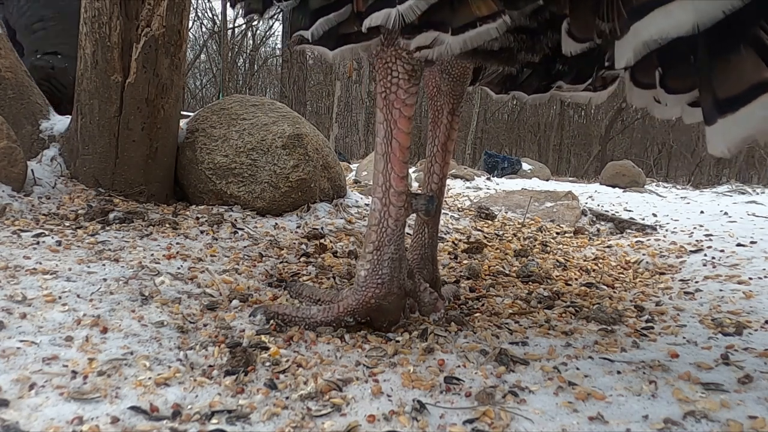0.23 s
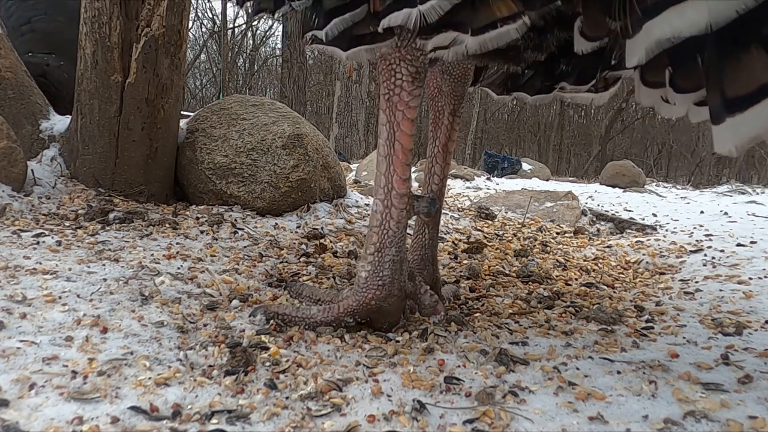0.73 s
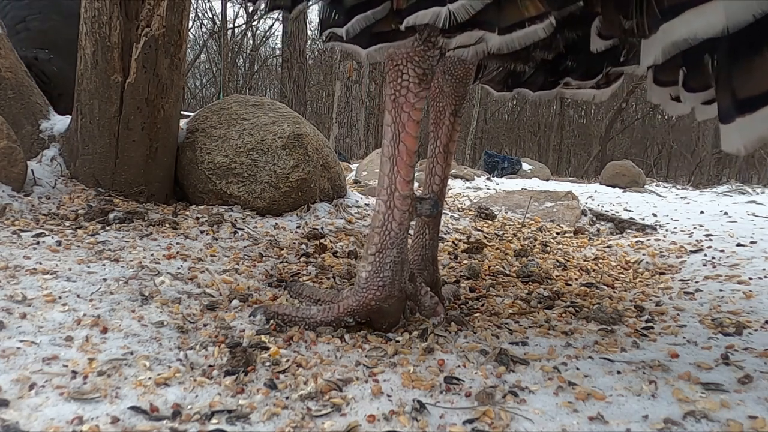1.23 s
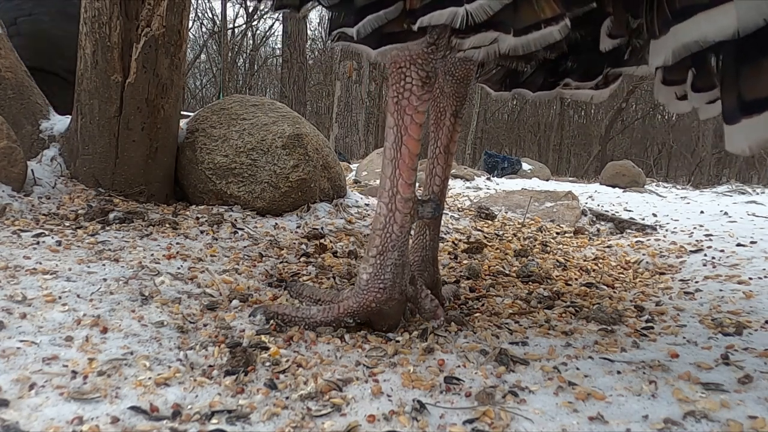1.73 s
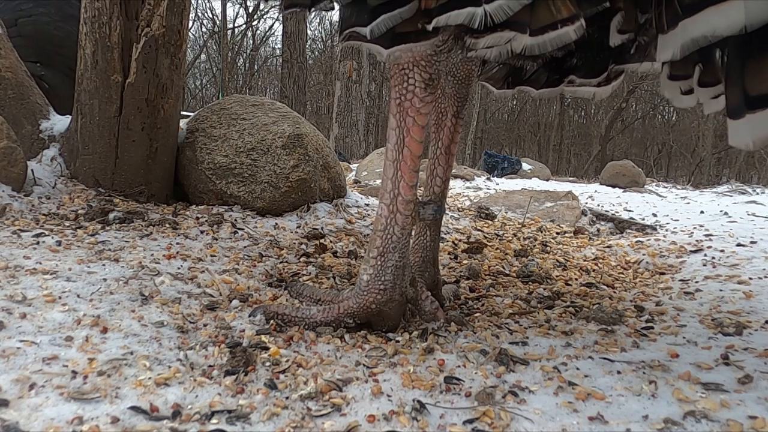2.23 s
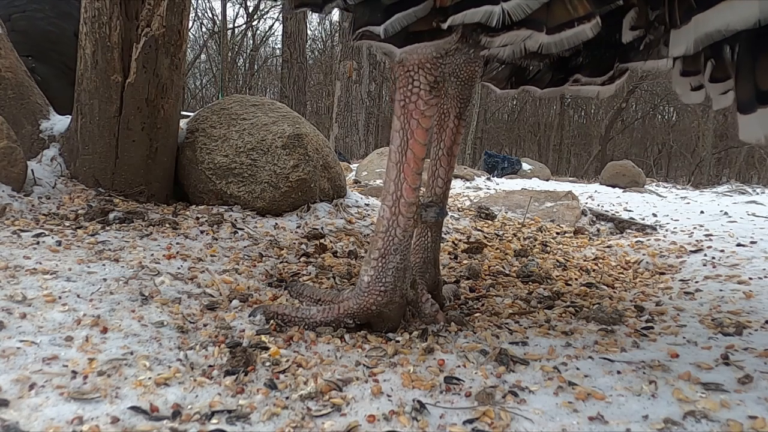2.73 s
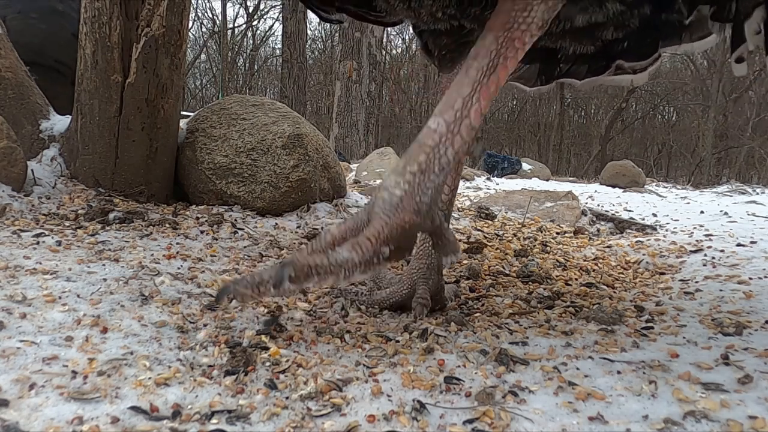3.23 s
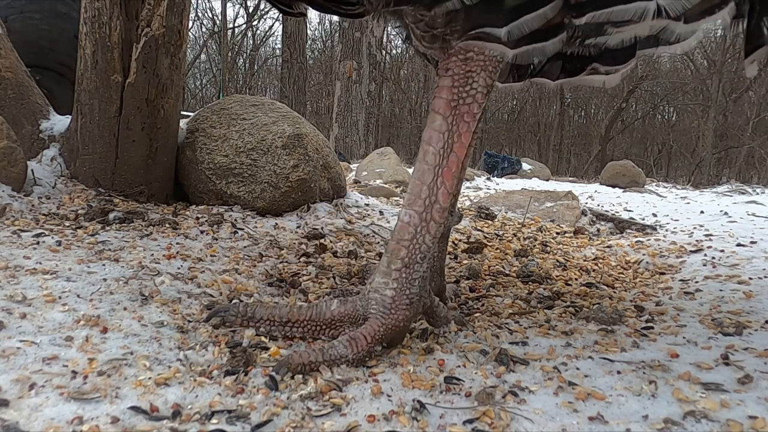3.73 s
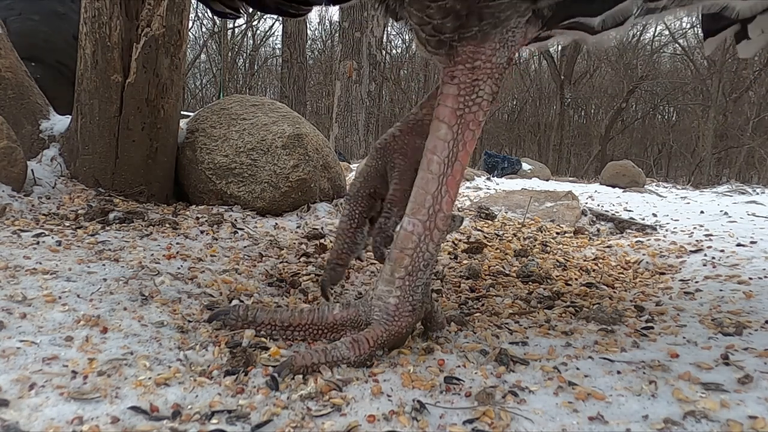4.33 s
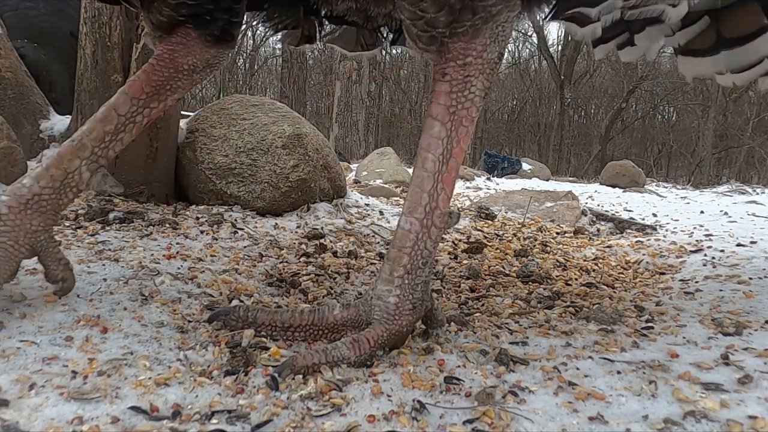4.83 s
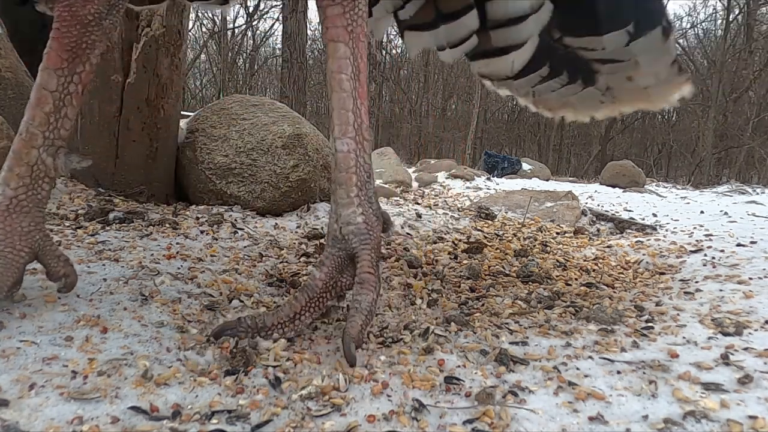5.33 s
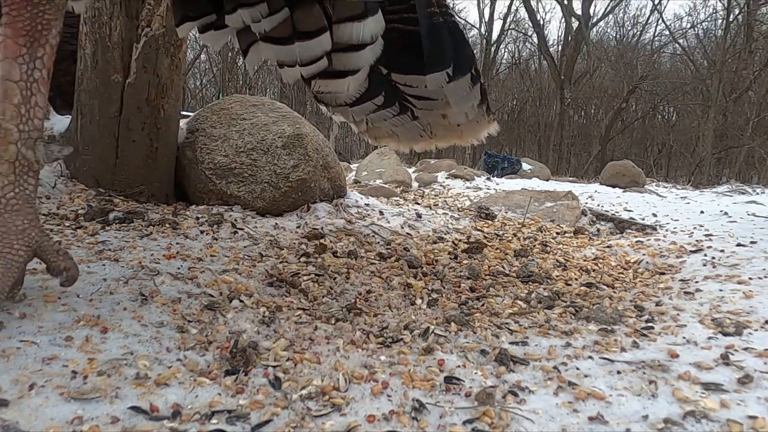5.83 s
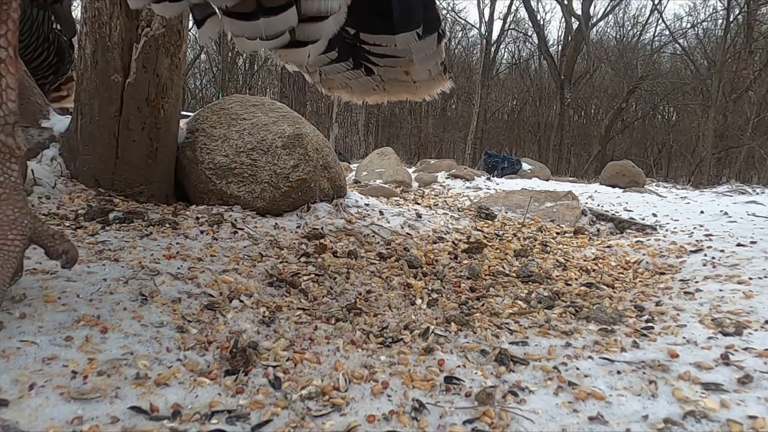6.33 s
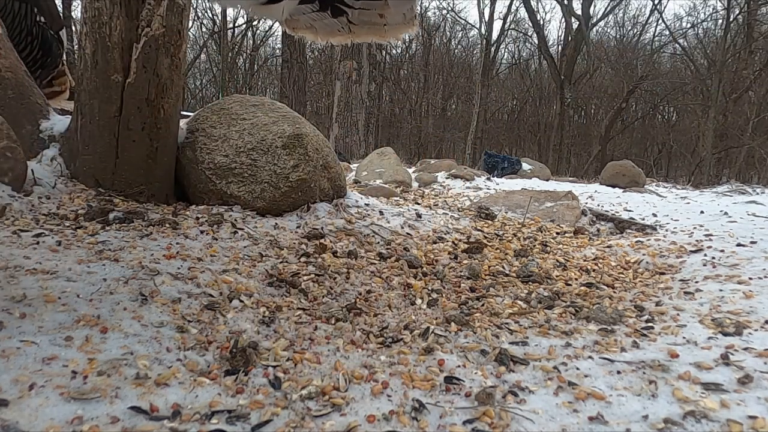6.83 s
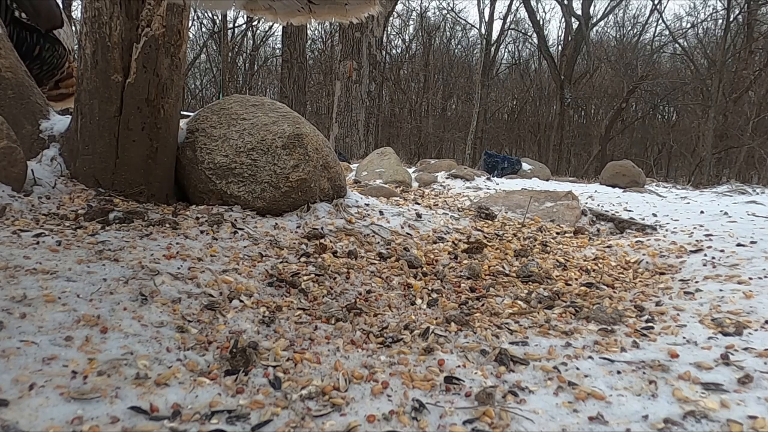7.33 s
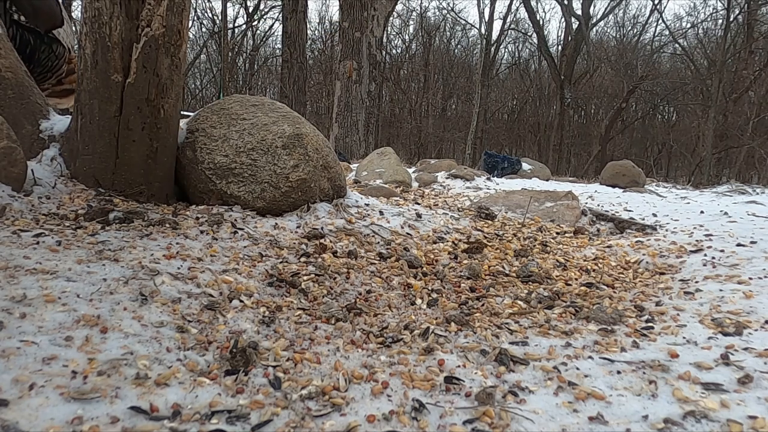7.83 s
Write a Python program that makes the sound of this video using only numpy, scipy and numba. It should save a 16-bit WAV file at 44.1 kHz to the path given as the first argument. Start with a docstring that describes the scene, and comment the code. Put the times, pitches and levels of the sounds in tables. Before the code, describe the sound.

Outdoors, over a soft low rumble and faint chirps of small birds, a turkey very close to the microphone whines thinly, pauses and whines again. Light scuffs and tiny snaps follow as it steps over frozen snow and seeds. A single loud gobble bursts out, a fast, rough warble about a second long with dull thumps beneath. Afterwards only a few faint ticks, chirps and the quiet woodland air remain.

```python
"""A soft, wavering whine sounds over a low, distant rumble: a wild turkey stands close by on snowy ground.
It whines again, shuffles over crust and seeds, then gobbles: three pitched cries and a run of rough
rattles, each closing in a low hoot. Squeaks lead into some of them, and its chest thumps.
The voice is a source and a filter: membranes in the syrinx vibrate, throat and beak shape the harmonics.
Small birds chirp among the trees at the edge of the wood."""
import sys
import numpy as np
from scipy import signal
from scipy.fft import rfft, irfft
from scipy.io import wavfile
from scipy.ndimage import uniform_filter1d
from numba import njit

SR = 44100
rng = np.random.default_rng(int(sys.argv[2]) if len(sys.argv) > 2 else 0)


def transcribe(u):
    """Save the signal u as a 16-bit wav file named by the first command-line argument.

    u: samples, shape (n,) or (channels, n), limited to [-1, 1]; the rate is SR.
    q: integer samples, one column per channel.
    """
    v = np.clip(np.atleast_2d(u).T, -1, 1)
    q = np.round(v * 32767).astype(np.int16)
    wavfile.write(sys.argv[1], SR, q)


N = 356548
T = np.arange(N) / SR
GOBBLE_START_S, GOBBLE_END_S = 5.28, 6.2
GOBBLING = (T > GOBBLE_START_S) & (T < GOBBLE_END_S)

# rattles that each close in a hoot (start [s], length [s], first pitch [Hz], last pitch [Hz],
# roughness [0-1], fundamental [dB], overtones [dB], hoot [dB])
SYLLABLES = [(5.386, 0.053, 795.3, 782, 0.53, -12, -24, -11),
             (5.491, .015, 711.6, 745, 0.75, -20, -18.5, -8.5),
             (5.555, .083, 718, 1066, 0.4, -13, -21, -13),
             (5.690, .014, 927.7, 909.5, 0.7, -15, -22.5, -12.5),
             (5.746, 0.011, 953, 929, 0.6, -11.5, -21, -19),
             (5.881, .016, 941.4, 879, 0.74, -16, -22, -22.5),
             (5.99, .014, 923, 949.5, 0.15, -17.5, -27.5, -15.5),
             (6.064, 0.032, 850.3, 746, 0.73, -16, -31, -12.5),
             (6.151, 0.0094, 943, 959, 0.62, -21.5, -31, -45)]
# frequency response of windpipe and throat (frequency [Hz], gain [dB])
THROAT = [(300, -10), (540, 7), (960, 4), (1400, -3.5), (3100, -5.5), (3550, -22), (4200, -1.5), (6100, -6),
          (7600, -1.5), (9300, -9), (15000, -20)]


def gobble(rough_rasp_db=8, upper_db=13.5, upper_width_hz=480.):
    """Source and filter: the vocal tract shapes the syrinx's tone, and three bands swell separately."""
    # the moving beak and loose throat
    # (time [s], resonance [Hz], upper resonance [Hz], rasp re overtones [dB], flapping hum [dB])
    mouth = [(5.318, 1780, 4350, -18, -0.5), (5.372, 1870, 4400, -27.5, -8), (5.392, 1530, 4400, -7, -9.5),
             (5.425, 2420, 4550, -3.5, 6.5), (5.5, 3080, 4300, -13, -9.5), (5.58, 2330, 4650, -6, -11.5),
             (5.63, 2670, 4350, -6, -2), (5.75, 2980, 4600, -9.5, -11), (6.08, 2740, 4950, -8, -13.5)]
    beak_hz, upper_hz, rasp_db, hum_db = curves(mouth, T)
    hz, rough, fundamental_gain, overtone_gain = strongest_gesture()
    # loose tissue flaps well below the pitch, and hums
    flap = np.sin(turns(200 * (1 + .12 * noise(10, 100))))
    voice = colour(syrinx(hz, rough, flap, beak_hz), THROAT)
    voice = stretched_throat(scatter(bounce(voice), wet_db=-11, t60_s=.04))
    bands_hz = [(250, 1280), (1350, 3500), (3700, 16000)]
    core, overtones, rasp = (even(band(voice, lo, hi, order=4)) for lo, hi in bands_hz)
    rasp = even(rasp + undb(upper_db) * resonance(rasp, upper_hz, upper_width_hz))
    lower = core + undb(hum_db) * rough * flap
    # the rougher the vibration, the harder the membranes slap
    upper = overtones + undb(rasp_db + rough_rasp_db * (rough - .5)) * rasp
    return GOBBLING * (fundamental_gain * lower + overtone_gain * upper)


def syrinx(hz, rough, flap, beak_hz, jitter=.1, flutter=.11, shimmer=.88, slope=1.4, hiss_db=-34):
    """Modulation of pitch and amplitude puts sidebands round each harmonic, weighted by the beak."""
    phase = turns(hz * (1 + rough * (jitter * noise(110, 1000) + flutter * flap)))
    source = np.zeros(N)
    on = GOBBLING
    for k in range(1, 22):
        source[on] += beak(k * hz[on], beak_hz[on]) * np.sin(k * phase[on]) / k ** slope
    source *= 1 + shimmer * rough * (flap + .5 * noise(64, 600))
    # air escapes once a cycle
    return source + undb(hiss_db) * (rough + .5) * (1 + np.cos(phase)) * noise(1500, 10000)


def strongest_gesture():
    """One oscillator, one pitch: the strongest gesture sets pitch and roughness, while powers add."""
    t = T[GOBBLING]
    gestures = [np.broadcast_arrays(*g) for g in (*cries(t), *rattles(t), *hoots(t))]
    hz, rough, fundamental, overtones = np.stack(gestures, axis=1)
    share = (fundamental ** 2 + overtones ** 2) ** 2 + 1e-30
    controls = (np.average(hz, 0, share), np.clip(np.average(rough, 0, share), 0, 1),
                np.linalg.norm(fundamental, axis=0), np.linalg.norm(overtones, axis=0))
    return [np.interp(T, t, control) for control in controls]


def cries(t, settled_rough=.07, onset_rough=.61, settle_s=.021):
    """An onset transient: each cry starts rough and settles into nearly periodic vibration."""
    # one contour per cry (time [s], pitch [Hz], fundamental [dB], overtones [dB])
    contours = [
        [(5.291, 542, -16.5, -28), (5.316, 622.7, -17.5, -14), (5.342, 509.3, -26, -24),
         (5.364, 585.3, -18, -16.5), (5.386, 680, -15.5, -20)],
        [(5.797, 570, -13.5, -32), (5.822, 656.4, -23.5, -24.5), (5.846, 509, -10.5, -38)],
        [(5.901, 645, -21, -34.5), (5.931, 710.7, -27.5, -19), (5.944, 602, -15.5, -30.5),
         (5.989, 503.3, -15, -46.5)],
    ]
    for cry in contours:
        start, end = cry[0][0], cry[-1][0]
        hz, db, overtones_db = curves(cry, t)
        rough = settled_rough + onset_rough * np.exp(-abs(t - start) / settle_s)
        shape = gate(t, start, end)
        yield hz, rough, shape * undb(db), shape * undb(overtones_db)


def rattles(t, strain_s=.017, strain_db=-7.5, strain_rough=.45):
    """Irregular vibration: as strain builds, the fundamental weakens and the tone grows rougher."""
    for start, length, first_hz, last_hz, rough, db, overtones_db, _ in SYLLABLES:
        end = start + length
        hz = np.interp(t, [start, end], [first_hz, last_hz])
        strain = 1 - np.exp(-np.maximum(t - start, 0) / strain_s)
        fundamental = gate(t, start, end) * undb(db + strain_db * strain)
        # the overtones speak first and linger
        overtones = gate(t, start - .002, end, attack_s=.003, release_s=.0037) * undb(overtones_db)
        yield hz, rough + strain_rough * (strain - .5), fundamental, overtones


def hoots(t, base_hz=634.6, tiring_hz_per_s=170, sag_hz_per_s=2600, rough=.053, overtones_db=-26):
    """As the driving pressure drops after a rattle, the syrinx falls back to a low, pure vibration."""
    lag_s, width_s = .0065, .0042
    for start, length, *_, db in SYLLABLES:
        end = start + length
        from_peak = np.clip(t - end - lag_s, -.06, .06)
        gain = undb(db) / np.cosh(from_peak / width_s)
        # each hoot is lower than the last and sags as it sounds
        hz = base_hz - tiring_hz_per_s * (end - GOBBLE_START_S) - sag_hz_per_s * from_peak
        yield hz, rough, gain, gain * undb(overtones_db)


def beak(hz, centre_hz, peak_db=13, width_hz=280, shadow_db=-9):
    """A formant: the mouth cavity lifts harmonics near its resonance and weakens those above."""
    peak = 1 + undb(peak_db) / (1 + ((hz - centre_hz) / width_hz) ** 2)
    above = .5 + .5 * np.tanh((hz - 1.275 * centre_hz) / width_hz)
    return peak * undb(shadow_db * above)


def stretched_throat(voice, notch_hz=1198, q=3.6):
    """Antiresonance: from the first rattle on, the throat cuts a hollow above the fundamental."""
    notch = np.concatenate(signal.iirnotch(notch_hz, q, SR))
    hollow = signal.sosfilt([notch, notch], voice)
    return voice + gate(T, SYLLABLES[0][0], GOBBLE_END_S) * (hollow - voice)


def bounce(x):
    """Comb filtering: echoes off ground and body interfere, and the notches shift as the bird moves."""
    # echo paths (delay [s], drift of the delay [s/s], gain [ratio])
    paths = [(.0021, .0005, 0.36), (.0047, -.0008, 0.32)]
    elapsed = T - GOBBLE_START_S
    return x + sum(gain * np.interp(T - delay - drift * elapsed, T, x) for delay, drift, gain in paths)


def squeaks(length=.03, plunge_at=.63, fall=.45, fall_s=.0033, jitter=.05, rasp_db=-3):
    """Tension sets pitch: the taut syrinx whistles, then plunges and frays as it slackens."""
    # squeaks (time of the plunge [s], top pitch [Hz], level [dB])
    plunges = [(5.483, 2980, -29.5), (5.547, 2900, -23), (5.682, 2430, -28), (5.738, 2410, -24),
               (5.872, 2405, -28), (6.142, 2350, -34.5)]
    out = np.zeros(N)
    u, shape = swell(length)
    slack = 1 / (1 + np.exp(-(u - plunge_at) * length / fall_s))
    waver = 1 + jitter * noise(150, 1200)
    rasp = unit(colour(noise(2300, 5000), THROAT))
    for s, hz, db in plunges:
        here = int(s * SR) + np.arange(len(u))
        whistle = tone(hz * (1 - fall * slack) * waver[here], second_db=-17)
        fray = undb(rasp_db) * slack * rasp[here]
        add(out, s - plunge_at * length, undb(db) * shape * (whistle + fray))
    return out


def shrill(start_s=5.377, end_s=5.401, jitter=.022):
    """A register break: tight membranes whistle for an instant as the first cry cracks."""
    # partials of the whistle (frequency [Hz], level [dB])
    partials = [(6950, -35), (8100, -37)]
    whistle = sum(undb(db) * np.sin(turns(hz * (1 + jitter * noise(100, 600)))) for hz, db in partials)
    return gate(T, start_s, end_s) * np.sqrt(2) * whistle


def ringing(voice, width_hz=40):
    """Lightly damped resonances store the voice's energy and ring on between syllables."""
    # resonances (frequency [Hz], gain [dB])
    modes = [(1040, -7), (3130, -4.5)]
    return sum(undb(db) * signal.lfilter(*signal.iirpeak(hz, hz / width_hz, fs=SR), voice + 1e-18)
               for hz, db in modes)


def whines(low_hz=740, high_hz=1560, whit_s=.0178, jitter=.051, second_db=-21):
    """Random frequency modulation makes two thin whines waver; each breaks into quick upward whits."""
    # one contour per whine (time [s], pitch [Hz], level [dB])
    contours = [
        [(.008, 689, -46), (.052, 734, -47.5), (.066, 1030, -49.5), (.083, 892, -75), (.098, 876, -38),
         (.113, 846, -36.5), (.130, 1120, -46)],
        [(2.705, 620, -53), (2.741, 702, -48), (2.766, 1055, -32.5), (2.779, 790, -43.5), (2.79, 1108, -41.5),
         (2.806, 1017, -63), (2.832, 690, -38), (2.846, 1450, -42)],
    ]
    # rising whits (time [s], level [dB])
    whits = [(0.171, -37), (0.219, -42), (0.266, -31), (2.885, -31), (2.932, -40.5), (2.98, -31.5)]
    out = np.zeros(N)
    waver = 1 + jitter * noise(74, 660)
    for whine in contours:
        hz, db = curves(whine, T)
        out += gate(T, whine[0][0], whine[-1][0]) * undb(db) * tone(hz * waver, second_db)
    u, shape = swell(whit_s)
    rise_hz = low_hz + (high_hz - low_hz) * u ** 1.34
    for s, db in whits:
        hz = rise_hz * waver[int(s * SR):][:len(u)]
        add(out, s - whit_s / 2, undb(db) * shape * tone(hz, second_db))
    # the nearly closed beak muffles the sound
    return scatter(band(out, 570, 1600), wet_db=-21, t60_s=.1, delay_s=.0035)


def chest(length=.12, hz=72, wobble=.25, quiver_db=-33):
    """Like a piston, each heave of the chest pushes a few uneven waves; the body quivers in between."""
    # heaves (time [s], level [dB])
    heaves = [(5.321, -17.5), (5.465, -25.5), (5.534, -28), (5.72, -27.5), (5.87, -25), (6.14, -26)]
    push = np.zeros(N)
    _, shape = swell(length)
    for s, db in heaves:
        add(push, s - length / 2, undb(db) * shape)
    thumps = push * np.sqrt(2) * np.sin(turns(hz * (1 + wobble * noise(14, 49))))
    shaking = uniform_filter1d(GOBBLING.astype(float), size=3000)
    return thumps + undb(quiver_db) * shaking * noise(41, 87)


def feet(snap_db=-8, decay_s=.0035, grain_db=3, crunch_db=2.5):
    """Brittle fracture snaps crust and seeds under the toes; friction makes showers of tiny grains."""
    # snaps (time [s], relative level [dB], band centre [Hz])
    snaps = [(.592, -51, 2200), (3.189, -36, 2660), (4.3216, -36.5, 1750), (4.36, -36, 1820),
             (4.38, -32.5, 1600), (4.45, -39.5, 1720), (4.938, -40.5, 3640), (6.8191, -43, 1390),
             (7.0434, -54, 4000), (7.998, -49, 2400)]
    # scuffs of feet and feathers (midpoint [s], length [s], level [dB], band centre [Hz])
    scuffs = [(3.235, 0.14, -58, 2320), (3.448, 0.046, -54, 2980), (3.61, 0.51, -62.5, 2330),
              (4.213, 0.46, -59, 1950), (5.157, 0.72, -66.5, 3000), (7.793, 1, -72, 3900)]
    out = np.zeros(N)
    t = T[:SR // 20]
    for s, db, hz in snaps:
        burst = unit(band(rng.standard_normal(len(t)), hz / 2, hz * 2, order=3))
        add(out, s, undb(db + snap_db) * np.exp(-t / decay_s) * burst)
    grains = rng.standard_normal(N) * undb(grain_db * noise(200, 1000) + crunch_db * noise(15, 90))
    for s, length, db, hz in scuffs:
        u, shape = swell(length)
        start = s - length / 2
        shower = np.take(grains, int(start * SR) + np.arange(len(u)), mode="wrap")
        add(out, start, undb(db) * shape * unit(band(shower, hz / 2, hz * 2)))
    return out


def small_birds(start_hz=5630, bend=.45, fall_hz=900, near_hoarse_hz=130, far_hoarse_hz=270):
    """Frequency sweeps: near chirps rise and level off; farther, more reverberant notes fall."""
    # near chirps (start [s], length [s], top pitch [Hz], level [dB])
    chirps = [(2.034, 0.041, 7460, -51.5), (4.406, 0.066, 7620, -58), (4.722, 0.045, 8200, -57),
              (6.784, .06, 7670, -64.5), (7.359, .08, 7400, -68.5)]
    # hoarse notes deeper in the wood (start [s], length [s], mean pitch [Hz], level [dB])
    twitters = [(0.629, 0.06, 3750, -65), (0.831, 0.2, 4330, -67), (1.309, .2, 4040, -64),
                (2.591, 0.065, 3720, -59), (3.076, 0.061, 3850, -64)]
    near, far = np.zeros((2, N))
    waver = noise(100, 900)
    for s, length, top_hz, db in chirps:
        u, shape = swell(length)
        hz = start_hz + (top_hz - start_hz) * np.tanh(u / bend) ** 2
        hz += near_hoarse_hz * waver[int(s * SR):][:len(u)]
        add(near, s, undb(db) * np.sqrt(2 * shape) * np.sin(turns(hz)))
    for s, length, mean_hz, db in twitters:
        u, shape = swell(length)
        hz = mean_hz - fall_hz * (u ** 2 - np.mean(u ** 2))
        hz += far_hoarse_hz * waver[int(s * SR):][:len(u)]
        add(far, s, undb(db) * np.sqrt(shape) * np.sin(turns(hz)))
    return scatter(near, wet_db=-2.5, t60_s=.6) + scatter(far, wet_db=1.8, t60_s=.96)


def air(waver_db=.8, buffet_db=-53):
    """Ambient noise: a distant rumble and faint hiss, with low buffets."""
    # spectrum of the wood's background (frequency [Hz], relative density [dB])
    spectrum = [(110, -1), (196, -4), (650, -32), (1200, -36), (2130, -48), (4200, -44), (8000, -51),
                (15000, -88.5)]
    # the background sinks under the gobble and creeps back (time [s], level [dB])
    levels = [(0, -44.5), (5.3, -44.5), (5.4, -58.5), (6.5, -51), (7.9, -43.5)]
    db = curves(levels, T)[0] + waver_db * noise(.98, 9.6)
    # the low buffets sink under the gobble and swell back, twice as far in dB as the background
    buffets = undb(buffet_db + 2 * (db - np.median(db))) * noise(33, 100)
    return unit(colour(rng.standard_normal(N), spectrum)) * undb(db) + buffets


def scatter(x, wet_db, t60_s, delay_s=0):
    """Reverberation: the direct sound plus dense reflections that decay exponentially."""
    t = T[:SR]
    tail = rng.standard_normal(SR) * np.exp(-np.log(1000) * t / t60_s) * (t > delay_s)
    return x + undb(wet_db) * signal.fftconvolve(x, tail / np.linalg.norm(tail))[:N]


@njit
def resonance(x, hz, width_hz):
    """A two-pole resonator with a moving centre and gain 1 there."""
    y, band_state, low_state = np.empty(len(x)), 0., 0.
    for i in range(len(x)):
        g, damping = np.tan(np.pi * hz[i] / SR), width_hz / hz[i]
        v = (band_state + g * (x[i] - low_state)) / (1 + g * (g + damping))
        band_state, low_state = 2 * v - band_state, low_state + 2 * g * v
        y[i] = damping * v
    return y


def colour(x, points, size=4096):
    """Minimum-phase filter through the points (frequency [Hz], gain [dB])."""
    hz, db = np.transpose(points)
    gain = undb(np.interp(np.log(np.fft.rfftfreq(size, 1 / SR) + 1), np.log(hz), db))
    cepstrum = irfft(np.log(gain))
    cepstrum[1:size // 2] *= 2
    cepstrum[size // 2 + 1:] = 0
    return signal.fftconvolve(x, irfft(np.exp(rfft(cepstrum))))[:N]


def band(x, lo_hz, hi_hz, order=2):
    """Band-pass filter."""
    return signal.sosfilt(signal.butter(order, [lo_hz, hi_hz], "band", fs=SR, output="sos"), x)


def noise(lo_hz, hi_hz):
    """Band-limited noise at rms 1."""
    return unit(band(rng.standard_normal(N), lo_hz, hi_hz))


def tone(hz, second_db):
    """A fundamental of rms 1 plus its second harmonic."""
    phase = turns(hz)
    return np.sqrt(2) * (np.sin(phase) + undb(second_db) * np.sin(2 * phase))


def turns(hz):
    """Phase [rad] as the integral of frequency."""
    return 2 * np.pi * np.cumsum(hz) / SR


def gate(t, start, end, attack_s=.0014, release_s=.0022):
    """Envelope with a rounded attack, a hold and a rounded release."""
    return (1 + np.tanh((t - start) / attack_s / 2)) * (1 + np.tanh((end - t) / release_s / 2)) / 4


def swell(length):
    """Progress 0-1 through a short sound, and its raised-cosine envelope."""
    u = np.linspace(0, 1, int(length * SR))
    return u, np.sin(np.pi * u) ** 2


def curves(table, t):
    """Linear interpolation of a table's columns at times t."""
    times, *columns = np.transpose(table)
    return [np.interp(t, times, column) for column in columns]


def even(x, size=500):
    """Hold the short-term rms at 1."""
    return x / np.sqrt(np.abs(uniform_filter1d(x ** 2, size)) + 1e-12)


def unit(x):
    """Scale to rms 1."""
    return x / np.sqrt(np.mean(x ** 2))


def undb(db):
    """Decibels to amplitude ratio."""
    return 10 ** (np.asarray(db) / 20)


def add(out, s, x):
    """Superpose a short sound at time s."""
    i = max(int(s * SR), 0)
    out[i:i + len(x)] += x[:N - i]


def scene():
    """Superposition of the close turkey, its reflections, the small birds and the background."""
    voice = gobble() + squeaks() + shrill()
    turkey = voice + ringing(voice) + whines()
    trunk_echoes = scatter(turkey, wet_db=-27.5, t60_s=.68, delay_s=.0089) - turkey
    trunks = band(trunk_echoes, 600, 2600, order=1)
    # nearby ground, rocks and feathers blur the syllables together
    close = scatter(turkey, wet_db=-18, t60_s=.14)
    return (close + trunks + chest() + feet() + small_birds() + air())[None]


def record(dry):
    """Band limiting: a steep low-pass cuts the treble above 15.6 kHz."""
    return signal.sosfilt(signal.ellip(8, .2, 70, 15600, fs=SR, output="sos"), dry)


dry = scene()
out = record(dry)
transcribe(out)
```